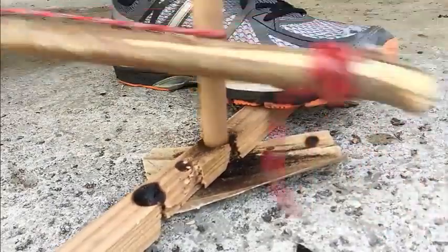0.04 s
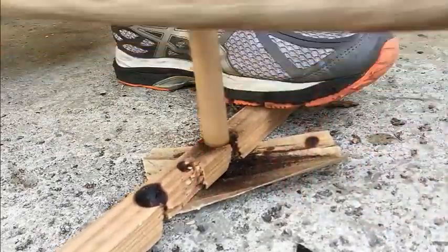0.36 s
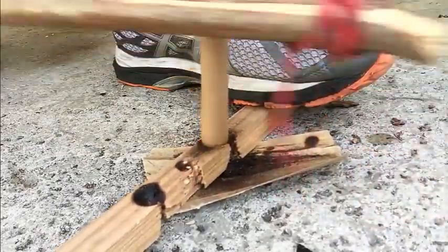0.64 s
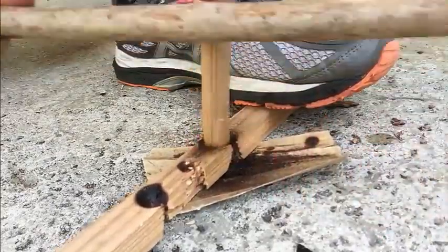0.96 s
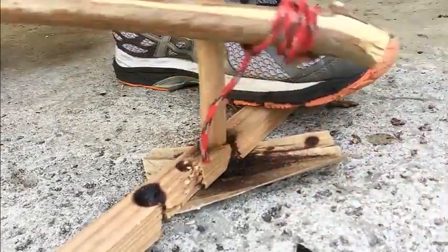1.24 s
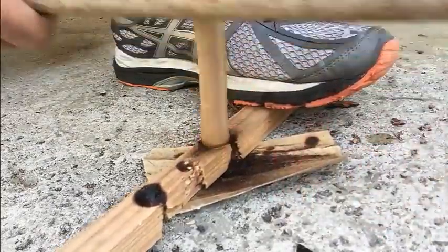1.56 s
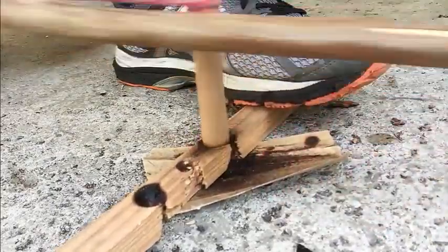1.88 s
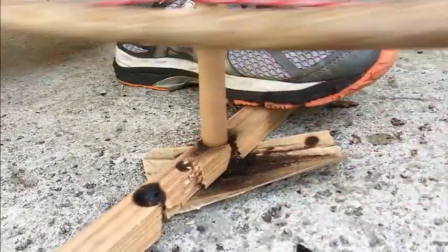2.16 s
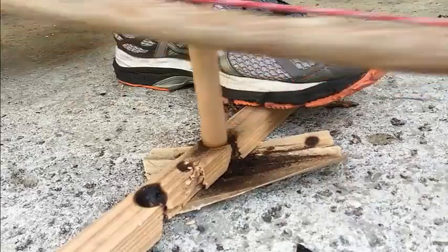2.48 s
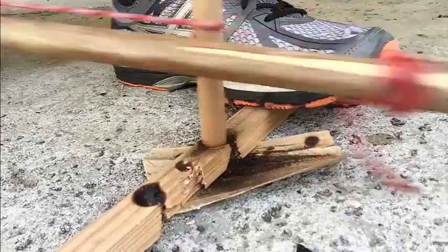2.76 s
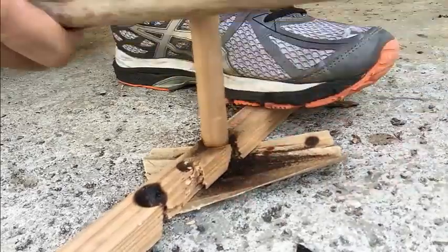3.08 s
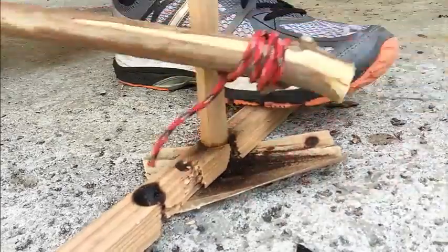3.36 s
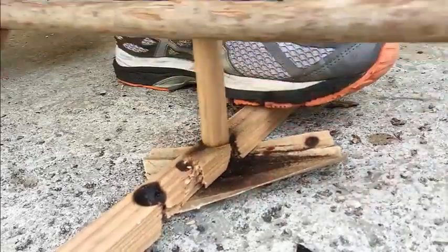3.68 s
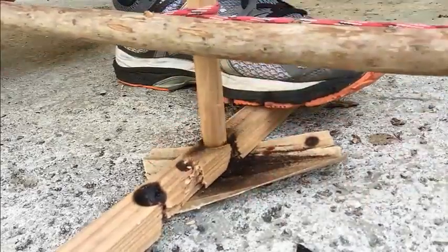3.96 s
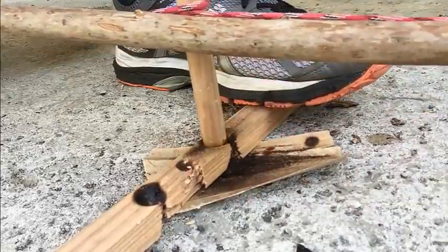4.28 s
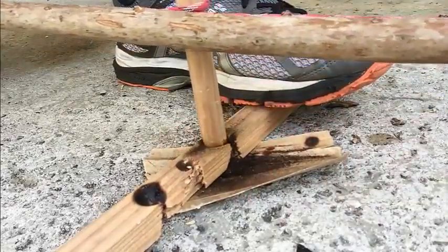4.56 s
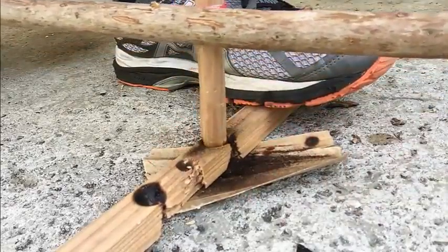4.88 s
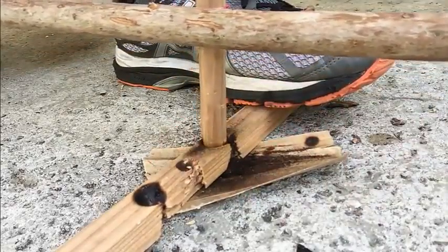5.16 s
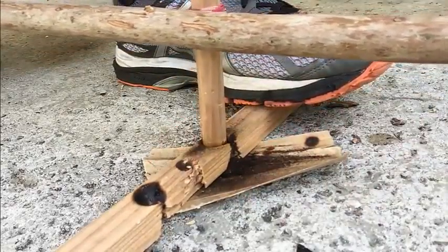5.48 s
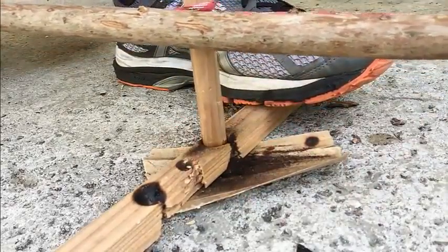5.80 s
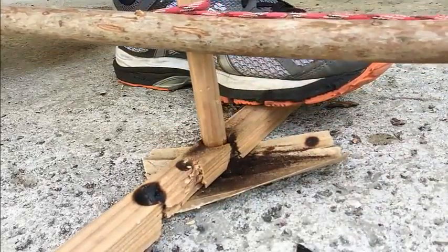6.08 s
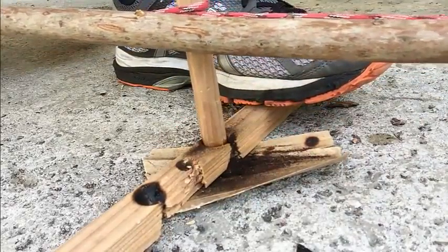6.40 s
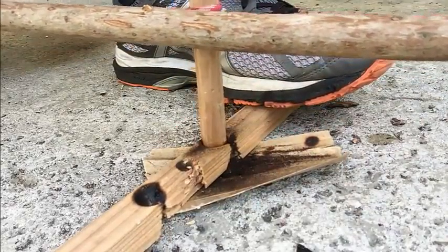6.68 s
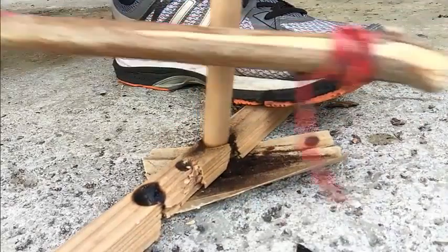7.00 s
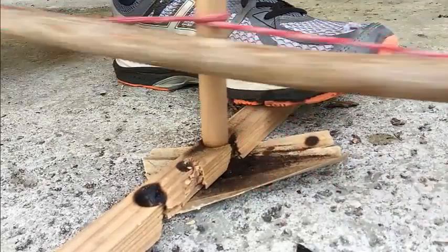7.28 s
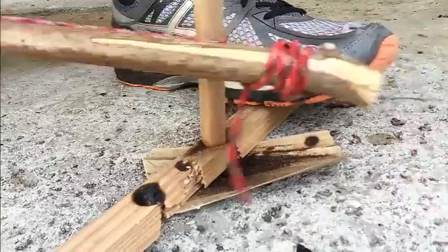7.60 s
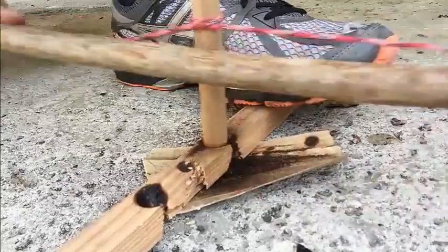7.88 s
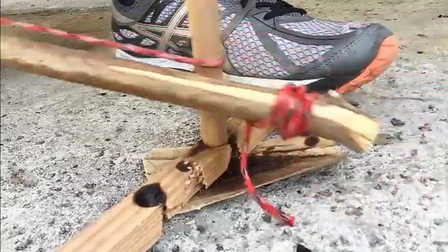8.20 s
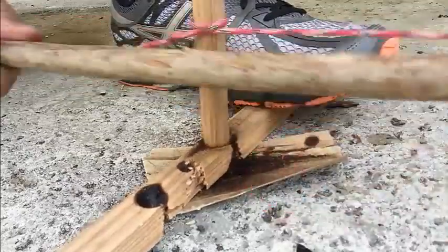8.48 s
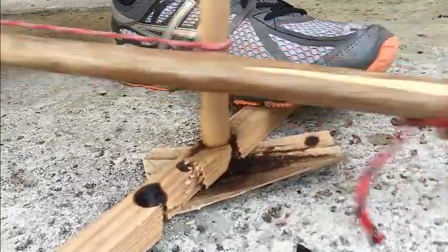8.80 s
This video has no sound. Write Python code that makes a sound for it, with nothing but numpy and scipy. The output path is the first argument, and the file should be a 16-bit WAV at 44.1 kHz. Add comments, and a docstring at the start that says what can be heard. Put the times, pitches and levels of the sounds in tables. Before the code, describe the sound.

From the start, a bow drill turns a wooden spindle in a wooden board, close to the microphone, at three or four strokes a second. Each stroke swells and fades as a coarse, dry grind with a fine hiss, dotted with shrill chirps, chattering squeals and small woody knocks. A harsher squeal comes at about 3.5 seconds, and the bowing stops at 3.6. In the pause, a faint low rumble and hum swell back, with brief dry rustles and small creaks of taut cord and wood, clearest near 4.7 and 6.1 seconds. At 6.8 seconds the bowing restarts slowly, with a loud squeaky creak near 7. The strokes regain their pace and continue until about 8.8 seconds, with dense, sharp squeals that peak near 7.4 and 7.9. The sound is fairly dry, with only quick, light reflections from nearby walls.

```python
"""A bow drill on a concrete floor, close to a phone. Stroke after stroke, a wooden spindle grinds in the
socket of a fireboard; its tip knocks, and chirps and squeals where it sticks and slips. At 3.6 s the bow
rests, and the taut cord and the wood creak over a low rumble. At 6.8 s the bowing starts again and runs
to the end. The loudest squeals hit the phone's limiter."""
import sys
import numpy as np
from scipy import signal
from scipy.fft import rfft, irfft
from scipy.io import wavfile
from scipy.ndimage import uniform_filter1d, minimum_filter1d

SR = 44100
rng = np.random.default_rng(int(sys.argv[2]) if len(sys.argv) > 2 else 0)


def unload_wav(signal):
    """Save mono or channel-first audio to the path in sys.argv[1] as 16-bit WAV at rate SR, clipped to [-1, 1]."""
    wavfile.write(
        sys.argv[1],
        SR,
        np.round(np.clip(np.atleast_2d(signal).T, -1, 1) * 32767).astype(np.int16),
    )


N = 390285
TIME = np.arange(N) / SR
TOP_HZ = 10950  # upper edge of the overtones and of the phone's band

# strokes of the bow: start_s, fastest_s, end_s, grind_db, hiss_db
BOW_STROKES = [(-0.052, 0.06, 0.2, -25, -30), (0.22, 0.376, 0.46, -30, -26.5),
               (0.51, 0.704, 0.78, -31.5, -35), (0.784, 0.939, 1.073, -29, -30.5),
               (1.081, 1.178, 1.364, -28, -31.5), (1.327, 1.48, 1.592, -25.5, -28.5),
               (1.628, 1.747, 1.888, -28, -32.5), (1.879, 2.005, 2.138, -25, -31.5),
               (2.148, 2.253, 2.438, -28, -33), (2.374, 2.54, 2.64, -27.5, -30.5),
               (2.653, 2.812, 2.91, -26.5, -28), (2.907, 3.06, 3.14, -23, -30),
               (3.179, 3.329, 3.467, -28, -32), (3.476, 3.554, 3.615, -23.5, -24),
               (6.796, 7.052, 7.212, -36, -35.5), (7.193, 7.341, 7.45, -25, -30),
               (7.511, 7.644, 7.75, -28, -30.5), (7.758, 7.895, 8.01, -28, -30),
               (8.076, 8.171, 8.33, -32.5, -30.5), (8.315, 8.497, 8.59, -27.5, -30),
               (8.65, 8.732, 8.78, -35, -26)]
# tone colour of wood grinding on wood: frequency_hz, level_db
GRIND_COLOUR = [(40, -29), (150, -1), (300, -2.5), (450, 0), (660, -7), (880, -1.5), (1100, -6.5),
                (1550, -4.5), (2300, -5.5), (3500, -14), (4500, -25), (10000, -35.5)]


def scrape(grind_db=3, hiss_db=5, turn_hz=33, wobble_db=1.5, catch_db=4, cord_db=-43):
    """Bow speed drives a coarse grinding and a fine hiss; both pulse as the uneven tip turns."""
    # tone colour of the fine friction: frequency_hz, level_db
    hiss_colour = [(500, -30), (1500, -5.5), (2200, 2.5), (2700, -1.5), (3600, 2.5), (4600, -2.5),
                   (5600, 1), (7000, 0), (8000, -6.5), (9300, 1.5), (11000, -15.5)]
    speed, grind_level, hiss_level = np.zeros((3, N))
    for start, fastest, end, coarse_db, fine_db in BOW_STROKES:
        swing = np.sin(np.pi * np.interp(TIME, [start, fastest, end], [0, .5, 1])).clip(0)
        speed += swing
        grind_level += undb(coarse_db + grind_db) * swing ** 2.35
        hiss_level += undb(fine_db + hiss_db) * swing ** 1.3
    spindle_angle = 2 * np.pi * np.cumsum(turn_hz * speed) / SR
    pressure_db = wobble_db * np.sin(spindle_angle) + catch_db * walk(rate_hz=190)
    coarse_fibres = grains(per_s=5000, spread_db=4) * undb(pressure_db)
    fine_fibres = grains(per_s=16000, spread_db=4) * undb(.6 * pressure_db)
    grind = unit(wood(colour(coarse_fibres, GRIND_COLOUR)))
    hiss = unit(wood(colour(fine_fibres, hiss_colour)))
    # the cord keeps rubbing while the bow turns round
    bowing = uniform_filter1d((speed > .01) * 1., int(.16 * SR))
    return grind_level * grind + np.hypot(hiss_level, undb(cord_db) * bowing) * hiss


def squeals(gain_db=.5, rasp_db=-5, thump_db=-14, thump_build_s=.024):
    """Friction locks onto a bending mode of the spindle and rasps; loud long squeals carry a low thump."""
    # hard catches of the tip, one squeal each: middle_s, level_db, pitch_hz, length_s, harshness_db
    catches = [(0.074, -5.5, 2160, .0046, -29), (0.311, -0.5, 3460, 0.0058, -9),
               (0.413, -1.5, 3580, 0.0093, -12.5), (0.432, -7.5, 1894, 0.0084, -33),
               (0.451, 2, 2237, 0.0063, -4), (0.568, -18.5, 2400, 0.0047, -8),
               (0.695, -7.5, 1962, .005, -23), (1.657, -12, 3073, .004, -11),
               (1.677, -5.5, 3480, .0045, -11.5), (2.201, -14.5, 2330, .008, -3),
               (2.691, -17, 2930, 0.0039, -14), (2.822, -6.5, 2021, 0.0073, -20),
               (3.09, -6.5, 3414, 0.0057, -27), (3.189, -10.5, 2393, 0.0063, -38),
               (3.236, -3, 3130, 0.0049, -12), (3.516, -9, 1981, 0.013, -17.5),
               (3.605, -10.5, 1856, .006, -15), (7.237, -12.5, 1977, 0.0086, -11.5),
               (7.426, -2.5, 1920, 0.0048, -10), (7.438, -14.5, 2370, 0.014, -14.5),
               (7.564, -6.5, 3590, 0.007, -26), (7.577, -6, 2153, 0.011, -11),
               (7.826, -2, 1815, 0.0074, -9.5), (7.864, 4, 1910, 0.0068, -8),
               (7.876, -2, 3710, 0.015, -15.5), (7.956, -3.5, 2000, 0.01, -7.5),
               (7.981, -10, 2113, 0.024, -16), (8.109, -26.5, 3750, 0.028, -28),
               (8.133, -1.5, 2280, .012, -14.5), (8.171, -5.5, 2220, 0.016, -11.5),
               (8.207, -3.5, 2074, 0.0091, -18), (8.275, -19.5, 2360, .018, -29),
               (8.381, -11, 1936, 0.0062, -9.5), (8.447, -2.5, 3610, .006, -14.5),
               (8.48, -9, 3600, 0.011, -12), (8.516, -10, 3614, 0.019, -14.5),
               (8.553, -5.5, 3840, 0.018, -13.5), (8.694, -6.5, 2382, 0.006, -7.5),
               (8.782, -4, 2088, 0.0047, -16.5)]
    # tone colour of the rasp at each slip: frequency_hz, level_db
    rasp_colour = [(100, -13.5), (500, -12), (1400, -7.5), (2500, 1), (3600, 7), (4700, -1), (5700, 8.5),
                   (7000, -2), (11000, -12)]
    tone, rasp, thump = np.zeros((3, N))
    for s, db, hz, length, harsh_db in list(catches) + chatter():
        wave, force = squeal(hz, length, glide(s), harsh_db)
        onset = s - 2 * length
        add(tone, onset, undb(db + gain_db) * wave)
        add(rasp, onset, undb(db + rasp_db) * force)
        add(thump, onset, undb(2 * min(db, 0) + thump_db) * force * min(length / thump_build_s, 1))
    return tone + rasp * noise(rasp_colour) + low_thump(thump)


def squeal(hz, length, semitones, harsh_db, overtones_db=(-1, -5, -10, -14)):
    """One squeal starts pure, then slips hard and turns harsh. Returns its tone and its slip force."""
    harsh = undb(harsh_db)
    phase, swell = slip_tone(hz, length, semitones, jitter=.024 + .06 * harsh, flutter=.15 + .2 * harsh)
    slipping = harsh * np.roll(swell, int(.19 * length * SR)) ** 1.6  # lags behind the pure tone
    overtones = sum(undb(db) * np.sin(k * phase) for k, db in enumerate(overtones_db, 2)
                    if k * hz < TOP_HZ)
    return swell * np.sin(phase) + slipping * overtones, slipping * (1 + np.cos(phase))


def chatter(scatter_db=1.1, detune_share=.022, swap_db=2.6):
    """The tip squeals once or twice a turn, two modes trading strength. Returns a row per squeal."""
    # runs of chatter: first_s, last_s, gap_s, length_s, first_db, last_db, pitch_hz, upper_mode_db
    runs = [(0.345, 0.397, .017, 0.0085, -8, -11.5, 2060, -1.5),
            (0.88, 0.957, .016, .006, -9, -3, 2076, -17),
            (0.992, 1.019, .026, .0055, -7, -10.5, 2040, -14.5),
            (1.42, 1.48, .015, 0.0061, -11.5, -0.5, 2034, -17),
            (1.491, 1.519, .029, 0.0065, -2, -6, 2003, -11.5),
            (1.748, 1.774, .016, .011, -12.5, -14.5, 2173, -25),
            (1.968, 2.038, .023, 0.0097, -12.5, -9.5, 2055, -9.5),
            (2.456, 2.521, .022, 0.011, -15, -9, 2074, -13),
            (2.548, 2.58, .015, 0.0091, -7, -6.5, 2190, -6.5),
            (3.034, 3.069, .018, .011, -9.5, 2, 2000, -7),
            (3.292, 3.363, .036, 0.0073, -22, -21.5, 1950, 8),
            (3.539, 3.589, .026, .023, 0, -4, 1694, -3.5), (3.621, 3.661, .02, 0.0077, -8.5, -20, 1916, 1),
            (7.322, 7.387, .016, .0055, -3.5, 1.5, 1920, -7.5),
            (7.897, 7.937, .02, 0.0068, -13.5, -9.5, 1995, 0),
            (8.429, 8.54, .036, 0.0056, -8, 0.5, 1927, -11),
            (8.716, 8.765, .023, .017, -12.5, -16, 2260, -12)]
    events = []
    for first, last, gap, length, first_db, last_db, hz, upper_db in runs:
        count = round((last - first) / gap) + 1
        upper_hz = 2707 + .45 * hz
        chance = rng.standard_normal((16, 3))
        for place, (size, detune, swap) in zip(np.linspace(0, 1, count), chance):
            s = first + place * (last - first)
            db = first_db + place * (last_db - first_db) + scatter_db * size
            tuning = 1 + detune_share * detune
            harsh_db = min(-13 + .97 * db + 329.5 * length, 0)  # louder and longer is harsher
            events.append((s, db - swap_db * swap / 2, hz * tuning, length, harsh_db))
            events.append((s, db + upper_db + swap_db * swap, upper_hz * tuning, length, harsh_db))
    return events


def glide(s, sag_semitones=-.4, semitones_per_s=14, spread_semitones=1.2):
    """Pitch sags as the tip lets go; squeals tend to fall as the bow speeds up and rise as it slows."""
    lateness_s = min((s - fastest for _, fastest, *_ in BOW_STROKES), key=abs)
    return sag_semitones + semitones_per_s * lateness_s + spread_semitones * rng.standard_normal()


def slip_tone(hz, length, semitones, jitter, flutter, growth_s=.01, waver_hz=240):
    """Phase and swell of a stick-slip tone, bent from -semitones to +semitones; long ones level off."""
    position = np.linspace(-2, 2, int(4 * length * SR))  # in lengths from the middle
    pole = np.exp(-2 * np.pi * waver_hz / SR)
    waver = signal.lfilter([1], [1, -pole], rng.standard_normal((2, len(position))))
    waver /= waver.std()
    pitch_hz = hz * 2 ** (semitones * np.tanh(position) / 12) * (1 + jitter * waver[0])
    swell = .5 ** (np.abs(2 * position) ** (.84 + length / growth_s)) * np.exp(flutter * waver[1])
    return 2 * np.pi * np.cumsum(pitch_hz) / SR, swell


def chirps(gain_db=9, crunch_db=3, low_hz=2170, high_hz=3560, length_s=.005, per_stroke=8):
    """Weak squeals in every stroke: one of two modes starts to sing, then breaks off in a crunch."""
    tone, crunch = np.zeros((2, N))
    for start, fastest, end, grind_db, _ in BOW_STROKES:
        for k, (place, mode, detune, size) in enumerate(rng.random((per_stroke, 4))):
            travel = .18 + .64 * (k + place) / per_stroke
            s = np.interp(travel, [0, .5, 1], [start, fastest, end])
            hz = (low_hz if mode < .6 else high_hz) * (1 + .103 * (detune - .5))
            gain = undb(grind_db + 7 * (size - .5)) * np.sin(np.pi * travel) ** 2
            phase, swell = slip_tone(hz, length_s, semitones=-1, jitter=.058, flutter=.19)
            add(tone, s - 2 * length_s, gain * undb(gain_db) * swell * np.sin(phase))
            add(crunch, s - length_s, gain * undb(crunch_db) * swell ** 4)
    return tone + crunch * unit(wood(noise(GRIND_COLOUR)))


def knocks(gain_db=2, rise_s=.00027, decay_s=.0024, above_grind_db=12, scatter_db=3, spread_s=.04):
    """The tip catches and drops back with a short woody crunch; two small jumps come near top speed."""
    # hard jumps of the tip in its socket: start_s, level_db
    hard_jumps = [(0.032, -8), (0.097, -6.5), (0.694, -4), (1.119, -13), (1.741, -13), (2.197, -9),
                  (2.534, -5.5), (2.781, -7), (2.819, 2.5), (3.03, -1.5), (6.804, -22.5), (7.273, -10),
                  (7.321, -0.5), (7.647, -1.5), (8.124, -22)]
    # tone colour of the impact: frequency_hz, level_db
    knock_colour = [(25, -35), (60, -22.5), (400, -8.5), (700, -10.5), (1500, 4.5), (2300, 0), (3500, -1),
                    (4800, -11.5), (7000, -12), (11000, -22.5)]
    small_jumps = [(fastest + spread_s * when, grind_db + above_grind_db + scatter_db * size)
                   for _, fastest, _, grind_db, _ in BOW_STROKES
                   for when, size in rng.uniform(-1, 1, (2, 2))]
    force = np.zeros(N)
    t = TIME[:SR // 20]
    for s, db in list(hard_jumps) + small_jumps:
        add(force, s, undb(db + gain_db) * np.exp(-t / decay_s) * (1 - np.exp(-t / rise_s)))
    return force * unit(wood(noise(knock_colour)))


def wood(force):
    """The contact force, heard directly and through the resonances of spindle and board."""
    # resonances of the wood: pitch_hz, width_hz, level_db
    modes = [(377, 100, -9), (1440, 180, -14.5), (1710, 390, -4.5), (2220, 450, 0.5), (2840, 371, -11),
             (3598, 170, -5.5), (5390, 210, -9)]
    return force + sum(undb(db) * resonate(force, hz, width_hz) for hz, width_hz, db in modes)


def ring_on(x, low_hz=2120, low_db=-19, high_hz=3780, high_db=-17, width_hz=330, rise_s=.013, t60_s=.18):
    """The two main modes of the wood linger faintly after each stroke."""
    t = TIME[:SR // 2]
    response = 0
    for hz, db in [(low_hz, low_db), (high_hz, high_db)]:
        tail = resonate(rng.standard_normal(len(t)), hz, width_hz)
        tail *= np.exp(-np.log(1000) * t / t60_s) * (1 - np.exp(-t / rise_s))
        response += undb(db) * tail / np.linalg.norm(tail) * np.sqrt(np.pi * width_hz / SR)
    return x + signal.oaconvolve(x, response)[:N]


def creaks(grit_db=-15, overtone_db=-3.5, thump_db=-10):
    """Cord and wood slip in gritty, overtone-rich creaks and long squeals, while bowing and in the pause."""
    # creaks: middle_s, level_db, pitch_hz, length_s, bend_semitones, overtone_slope_db_per_octave
    strains = [(0.479, -5.5, 1980, .025, -1.2, -4), (3.178, -22, 2303, .017, .7, 1.5),
               (4.349, -37, 1114, .014, -0.81, -16), (4.688, -14, 1994, 0.0056, 0, -2.5),
               (5.395, -29, 949, .012, 0.11, -11.5), (5.773, -19, 1152, .008, 0.051, -28.5),
               (6.115, -18.5, 943, 0.013, -0.04, -6.5), (6.134, -13.5, 971, .016, -0.067, -6.5),
               (6.223, -28, 1013, .007, -0.055, -12.5), (6.965, -3.5, 2229, .02, -1, -6.5)]
    # tone colour of the grit in a creak: frequency_hz, level_db
    grit_colour = [(300, -32), (700, -17.5), (1100, -13), (1700, -4), (2900, -0.5), (4500, -10.5),
                   (5800, -4.5), (7500, -11), (11000, -16.5)]
    tone, grit, thump = np.zeros((3, N))
    for s, db, hz, length, semitones, slope_db in strains:
        jitter, flutter = (.018, .12) if db > -25 else (.05, .3)  # a weak creak never settles
        phase, swell = slip_tone(hz, length, semitones, jitter, flutter)
        orders = np.arange(1, int(TOP_HZ / hz) + 1)
        # overtones near the spindle's own modes stand out
        lift_db = sum(peak_db * np.exp(-((orders * hz - mode_hz) / width_hz) ** 2)
                      for mode_hz, width_hz, peak_db in [(1950, 400, 11), (5800, 500, 5.5)])
        gains = undb(slope_db * np.log2(orders) + (orders > 1) * (overtone_db + lift_db))
        # the overtones only come in once the slip is strong
        partials = np.sin(np.outer(orders, phase)) * swell ** np.where(orders > 1, 1.7, 1)[:, None]
        onset = s - 2 * length
        add(tone, onset, undb(db) * (gains @ partials))
        add(grit, onset, undb(db + grit_db + slope_db / 2) * swell ** 2 * (1 + np.cos(phase)))
        add(thump, onset, undb(4 * db + thump_db) * swell ** 2)
    return tone + grit * noise(grit_colour) + low_thump(thump)


def low_thump(envelope):
    """A low thump under the loudest long squeals and creaks."""
    # tone colour of the thump: frequency_hz, level_db
    thump_colour = [(15, -10.5), (35, -3), (85, 0), (150, -5), (400, -29)]
    return uniform_filter1d(envelope, SR // 300) * noise(thump_colour)


def rustles(gain_db=2, rise_share=.09, faint_db=-60, scatter_db=3, faint_span_s=(2.9, 5.7), count=9):
    """Brief dry rustles as the grip shifts, with faint ones among them; the longer ones start softly."""
    # slips of the cord and the resting tip: start_s, level_db, decay_s
    grip_slips = [(3.79, -50, 0.033), (4.081, -48, 0.024), (4.359, -35, 0.0063), (4.684, -29.5, 0.0092),
                  (4.725, -44, 0.02), (4.764, -41, 0.013), (4.951, -42.5, .008), (5.483, -38, 0.027),
                  (5.751, -39, 0.017), (5.872, -49, 0.022), (6.223, -42, 0.023), (6.66, -44, 0.016),
                  (6.773, -43.5, .028), (6.84, -64, 0.067)]
    # tone colour of a rustle: frequency_hz, level_db
    rustle_colour = [(300, -10), (700, -14.5), (1100, -6.5), (1800, -0.5), (2800, -11), (3700, -9),
                     (4700, -21), (5700, -12), (11000, -21.5)]
    faint_slips = [(np.interp(k + place, [0, count], faint_span_s),
                    faint_db + scatter_db * (2 * size - 1), .023)
                   for k, (place, size) in enumerate(rng.random((count, 2)))]
    force = np.zeros(N)
    t = TIME[:SR // 2]
    for s, db, decay_s in list(grip_slips) + faint_slips:
        attack = 1 - np.exp(-t / (rise_share * decay_s))
        add(force, s, undb(db + gain_db) * attack * np.exp(-t / decay_s))
    return force * unit(colour(grains(per_s=7000, spread_db=4.5), rustle_colour))


def reflections(x, near_db=-19, near_t60_s=.21, far_db=-39, far_t60_s=.68, gap_s=.0092):
    """Nearby walls add quick reflections and a faint longer tail."""
    t = TIME[:SR // 2]
    response = 0
    for db, t60_s in [(near_db, near_t60_s), (far_db, far_t60_s)]:
        tail = rng.standard_normal(len(t)) * np.exp(-np.log(1000) * t / t60_s) * (t > gap_s)
        response += undb(db) * tail / np.linalg.norm(tail)
    return x + signal.oaconvolve(x, response)[:N]


def background(sway_db=1, drift_share=.012):
    """A low rumble with a faint hum; both dip as the bow stops and swell back in the pause."""
    # tone colour of the rumble: frequency_hz, level_db
    rumble_colour = [(15, -67.5), (25, -35), (59, -8.5), (130, -4), (246, -7), (265, -15), (476, -18),
                     (733, -30), (1160, -23), (1930, -37.5), (2420, -31.5), (4930, -47), (7980, -43),
                     (10800, -63.5), (14100, -96), (22000, -120)]
    # level curve of the background: time_s, level_db
    fader = [(0, -52), (3.502, -51), (3.72, -69.5), (4.0, -60.5), (4.399, -49), (6.8, -49.5), (7.3, -45.5),
             (8.85, -54)]
    # tones of the hum at its loudest: pitch_hz, level_db
    hum_tones = [(75, -59), (140, -59), (241, -54.5)]
    times_s, fader_db = np.transpose(fader)
    level_db = np.interp(TIME, times_s, fader_db)
    rumble = noise(rumble_colour, size=8192) * undb(sway_db * walk(rate_hz=18))
    hum = 0
    for hz, db in hum_tones:
        pitch_hz = hz * (1 + drift_share * walk(rate_hz=9.8))
        hum += np.sqrt(2) * undb(db) * np.sin(2 * np.pi * np.cumsum(pitch_hz) / SR)
    return rumble * undb(level_db) + hum * undb(level_db - fader_db.max())


def grains(per_s, spread_db):
    """Fibres catching and letting go: random clicks, most of them small."""
    size = undb(spread_db * np.minimum(rng.exponential(size=N), 4))
    return unit((rng.random(N) < per_s / SR) * size * rng.choice([-1, 1], N))


def walk(rate_hz):
    """A smooth random drift at rms 1."""
    step = max(int(SR / rate_hz), 1)
    held = np.repeat(rng.standard_normal(N // step + 1), step)
    return unit(uniform_filter1d(held, step)[:N])


def noise(outline, size=2048):
    """Coloured noise at rms 1."""
    return unit(colour(rng.standard_normal(N), outline, size))


def colour(x, outline, size=2048):
    """Minimum-phase equaliser through (frequency_hz, level_db) points."""
    hz, db = np.transpose(outline)
    bins_hz = np.maximum(np.fft.rfftfreq(size, 1 / SR), 1)
    gain = undb(np.interp(np.log(bins_hz), np.log(hz), db))
    cepstrum = irfft(np.log(gain))
    cepstrum[1:size // 2] *= 2
    cepstrum[size // 2 + 1:] = 0
    return signal.oaconvolve(x, irfft(np.exp(rfft(cepstrum))))[:N]


def resonate(x, hz, width_hz):
    """Ring one resonance."""
    return signal.lfilter(*signal.iirpeak(hz, hz / width_hz, SR), x)


def undb(db):
    """Decibels to gain."""
    return 10 ** (np.asarray(db) / 20)


def unit(x):
    """Scale to rms 1."""
    return x / np.sqrt(np.mean(x ** 2))


def add(track, start_s, sound):
    """Mix a sound into the track."""
    index = int(start_s * SR) + np.arange(len(sound))
    inside = (index >= 0) & (index < N)
    track[index[inside]] += sound[inside]


def scene():
    """The drill and its reflections over the background, in mono."""
    drill = ring_on(scrape() + squeals() + chirps() + knocks())
    return (reflections(drill + creaks() + rustles()) + background())[None]


def record(dry, ceiling=1.1, window=SR // 1500, clip_top_hz=15800):
    """The phone's fast limiter holds the peaks, the treble is cut, and what still overshoots clips."""
    headroom = minimum_filter1d(np.minimum(ceiling / (np.abs(dry) + 1e-9), 1), window)
    limited = dry * uniform_filter1d(headroom, window)
    narrow = signal.sosfilt(signal.ellip(8, .2, 70, TOP_HZ, fs=SR, output="sos"), limited)
    clipped = np.clip(narrow, -1, 1)
    return signal.sosfilt(signal.ellip(8, .2, 70, clip_top_hz, fs=SR, output="sos"), clipped)


dry = scene()
out = record(dry)
unload_wav(out)
```